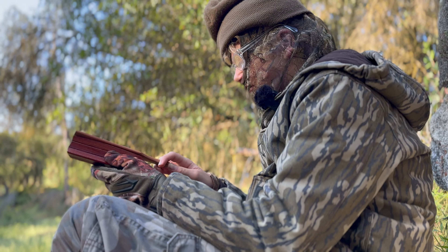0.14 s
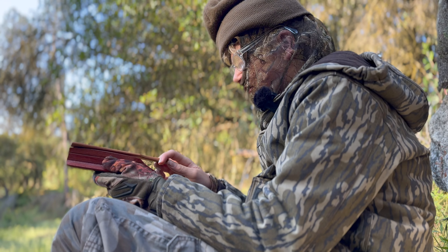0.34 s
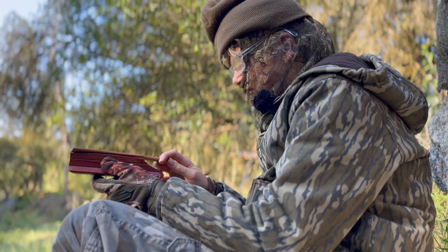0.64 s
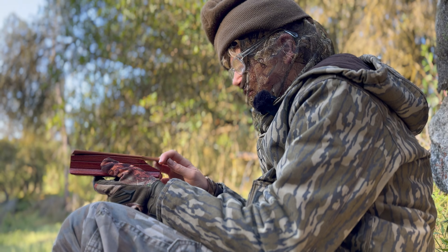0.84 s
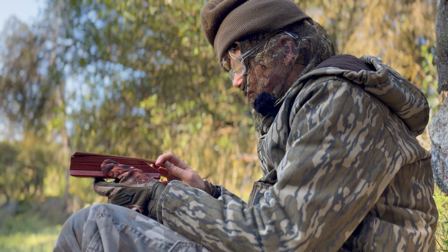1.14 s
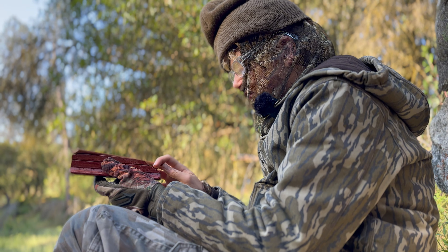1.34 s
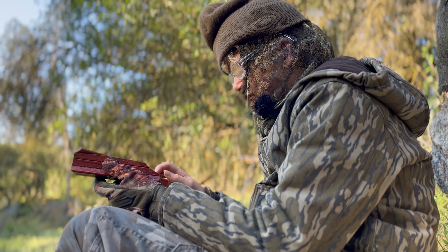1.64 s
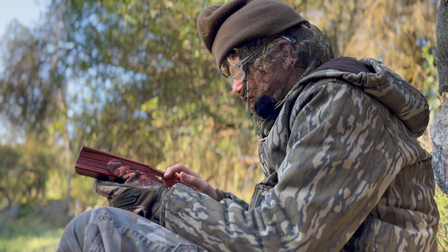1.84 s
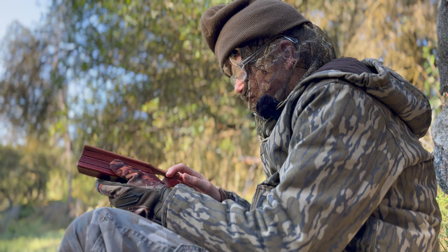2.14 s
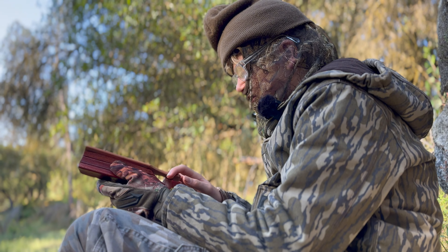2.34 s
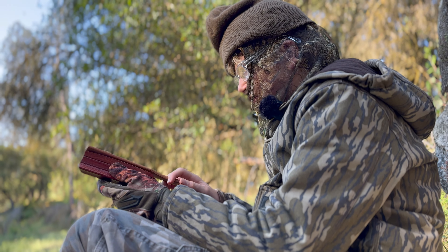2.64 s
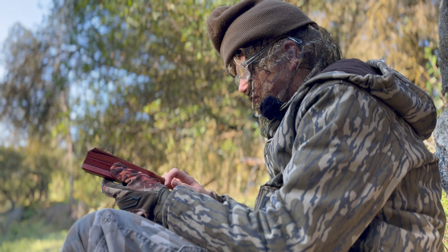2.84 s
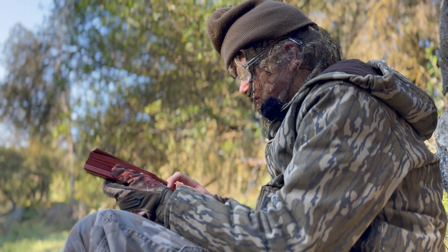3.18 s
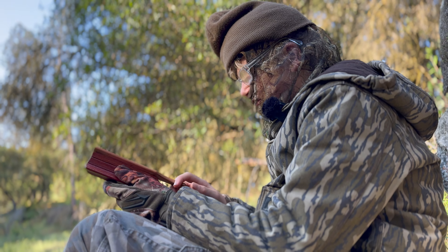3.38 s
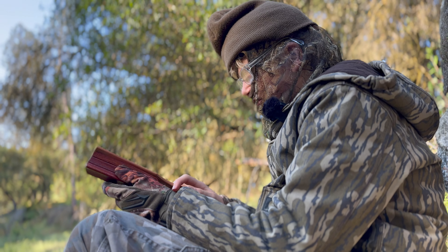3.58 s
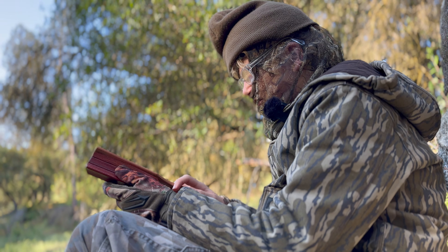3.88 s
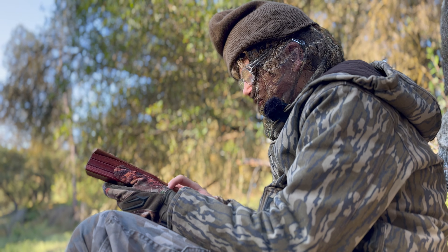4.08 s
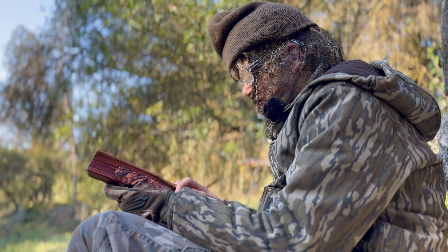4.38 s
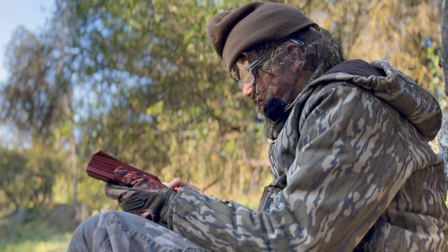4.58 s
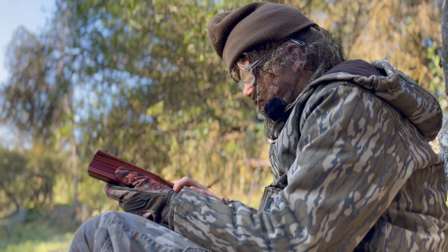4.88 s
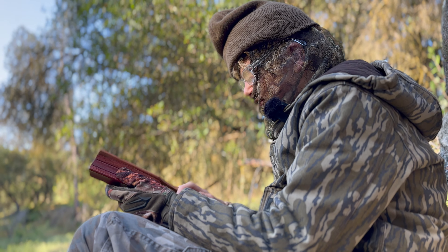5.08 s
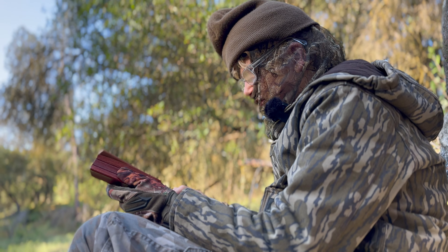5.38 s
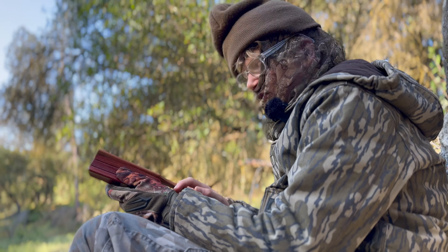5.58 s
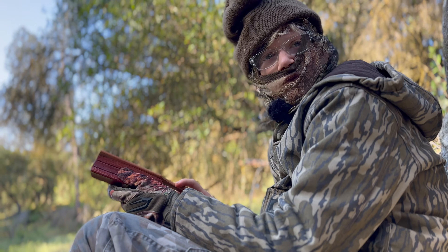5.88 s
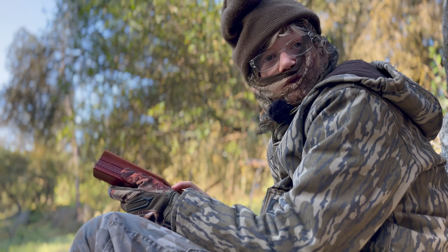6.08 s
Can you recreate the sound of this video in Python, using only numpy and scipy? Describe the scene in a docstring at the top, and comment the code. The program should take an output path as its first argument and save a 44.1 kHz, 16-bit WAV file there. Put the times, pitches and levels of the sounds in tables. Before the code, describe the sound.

Quiet stereo outdoor air with rustling leaves and a far engine rumble. Nearby, a hand-worked box call yelps like a hen: a short clear whistle breaks into a loud, bright woody rasp and stops abruptly. Two yelps are well separated, with brief chirping clucks between; then four come faster, mostly yelp-cluck. The paddle slides back with a faint hiss. A thin songbird chirps and warbles on the right in the middle, and the engine swells slightly late.

```python
"""A short cluck of a hollow wooden box call, amid leaf noise and a far engine; yelps and more clucks follow.
A chalked paddle sticks and slips on the lip: each slip is a click that rings the modes of the box.
A yelp starts as a clear whistle, one slip a cycle, then rasps as the side wall swings at its own pitch.
The paddle's return is hissing noise through the same modes; a songbird of gliding sines sits to the right.
Leaves and engine are shaped stereo noise."""
import sys
import numpy as np
from scipy import signal
from scipy.fft import rfft, irfft, next_fast_len
from scipy.io import wavfile
from scipy.ndimage import uniform_filter1d

SR = 44100
rng = np.random.default_rng(int(sys.argv[2]) if len(sys.argv) > 2 else 0)


def master_out(mix):
    """Clip the mix to full scale and print it as 16-bit PCM to the path in sys.argv[1]."""
    frames = np.transpose(np.atleast_2d(mix))
    ceiling = np.clip(frames, -1, 1)
    pcm = np.round(ceiling * 32767).astype(np.int16)
    wavfile.write(sys.argv[1], SR, pcm)


N = 274325
SIZE = next_fast_len(N + SR // 2)
HZ = np.arange(SIZE // 2 + 1) * SR / SIZE
TIME = np.arange(N) / SR


def from_db(db):
    """Decibels to gain."""
    return 10 ** (np.asarray(db) / 20)


def rms_one(x):
    """Scale to rms 1."""
    return x / np.sqrt(np.mean(x ** 2) + 1e-20)


def at_hz(points):
    """A spectrum table interpolated over log frequency on the FFT grid."""
    hz, value = np.transpose(points)
    return np.interp(np.log(HZ + 1), np.log(hz), value)


def at_time(points):
    """A level table in dB interpolated over time, as gain."""
    s, db = np.transpose(points)
    return from_db(np.interp(TIME, s, db))


def filtered(x, response):
    """Apply a frequency response."""
    return irfft(rfft(x, SIZE) * response, SIZE)[..., :N]


def resonance(hz, width_hz):
    """One mode, gain 1 on top."""
    return 1j * HZ * width_hz / (hz ** 2 - HZ ** 2 + 1j * HZ * width_hz)


def drift(rate_hz):
    """Slow random wander, rms 1."""
    return rms_one(filtered(rng.standard_normal(N), 1 / (1 + 1j * HZ / rate_hz) ** 2))


def evened(x, seconds):
    """Divide out the running level shared by both sides."""
    width = int(seconds * SR)
    power = uniform_filter1d(uniform_filter1d(np.mean(x ** 2, axis=0), width), width)
    return x / np.sqrt(power + 1e-12)


# Yelps. Each row: touch, grip, break, loudest, slowest, last ring, lift (all in seconds), whistle in Hz,
# slip rate when loudest and slowest in Hz, wall swing when loudest, slowest and at the end in Hz,
# low-mode level when loudest and at the last ring in dB, brightness offset in dB,
# low-mode level when slowest in dB, third-tone strength 0-1, climb of the whistle to the break in seconds.
YELP_STROKES = [(1.705, 1.742, 1.795, 1.848, 1.866, 1.913, 1.936, 1090, 905, 875, 1210, 1225, 1495, -12.5, -17, 0, -15, .5, .011),
                (3.165, 3.209, 3.231, 3.266, 3.300, 3.320, 3.342, 1125, 900, 800, 1195, 1010, 1000, -11, -19, -1, -18, .9, .016),
                (4.29, 4.326, 4.350, 4.385, 4.402, 4.443, 4.469, 1180, 924, 870, 1246, 1270, 1490, -11, -14, 0, -13.5, .55, .012),
                (4.671, 4.683, 4.705, 4.755, 4.775, 4.791, 4.814, 1088, 927, 925, 1245, 1250, 1080, -11.5, -13, 0, -13, .45, .02),
                (5.016, 5.027, 5.046, 5.085, 5.112, 5.126, 5.146, 1082, 919, 895, 1300, 1280, 1050, -9.5, -14, 1, -13, .25, .016),
                (5.369, 5.381, 5.400, 5.445, 5.462, 5.476, 5.497, 1083, 900, 890, 1310, 1310, 1050, -9.5, -13, 2, -14, .3, .016)]
# Clucks, the lip nudged briefly. Each row: touch and length in seconds, slowest slip rate in Hz,
# low, middle and bright mode levels in dB, low-mode level at letting go in dB, roughness 0-1.
CLUCK_STROKES = [(0.09, 0.023, 990, -44, -68, -70, -48, .05),
                 (2.478, 0.039, 849, -19.5, -35, -52.5, -43.5, 0.03),
                 (3.43, 0.049, 769.7, -21.5, -29.5, -26.5, -29, .22),
                 (4.838, 0.023, 948.7, -24, -38, -37, -31, .18),
                 (5.186, .028, 948.6, -20.5, -36, -33.5, -25.5, .22),
                 (5.55, .041, 795, -21.5, -31, -28, -25, .24)]
# Edges of the low, middle and bright mode groups in Hz.
MODE_GROUP_EDGES_HZ = [0, 1750, 2800, 20000]


def box_call():
    """Slips and grit ring the box; the hand's pressure sets the level of each stroke."""
    strokes = [yelp(*row) for row in YELP_STROKES] + [cluck(*row) for row in CLUCK_STROKES]
    strokes.sort(key=lambda rows: rows[0, 0])
    s, *columns = np.vstack(strokes).T
    curves = [np.interp(TIME, s, column) for column in columns]
    slip_hz, wall_hz, coupling, low_db, middle_db, bright_db, rough, beat = curves
    gripping = sum((TIME > rows[0][0]) & (TIME < rows[-1][0]) for rows in strokes)
    rough, coupling = np.clip(rough, 0, 1), np.clip(coupling, 0, 1)

    force, phase = slips(slip_hz, wall_hz, coupling, rough, beat)
    grains = rough ** 1.4 * grit(phase, fading=1.2, apart=.33)
    soft = filtered(force, 1 / (1 + 1j * HZ / 7500) ** 4)  # chalk cushions the slip
    low, middle, bright = map(box_response, MODE_GROUP_EDGES_HZ, MODE_GROUP_EDGES_HZ[1:])
    stroke = evened(filtered(force + .22 * grains, low), .006) * from_db(low_db)
    stroke += evened(filtered(force + .42 * grains, middle), .0058) * from_db(middle_db)
    stroke += evened(filtered(soft + .4 * grains, bright), .004) * from_db(bright_db)
    no_bass = (1j * HZ / (450 + 1j * HZ)) ** 3  # the swell of a stroke carries no bass
    return filtered(gripping * stroke, no_bass) + paddle_return(low, middle, bright)


# Stages of a yelp. Each tuple: wall coupling, low, middle and bright mode levels in dB, roughness.
# Bright levels precede the yelp's brightness offset; coupling and roughness are later clipped to 0-1.
TOUCH, GRIP = (0, -57, -59, -62, .5), (0, -26, -28.5, -31, .05)
HOLD, BREAK = (0, -26, -24, -27.5, .18), (0, -22, -13.5, -13.5, .3)
RASP, LIFT = (.9, -17.5, -18.5, -15, .4), (.6, -84, -53, -59.5, -.1)
# Each tuple: wall coupling, middle and bright levels in dB, roughness; the low level is the yelp's own.
LOUDEST, SLOWEST = (1.7, -19.5, -17.5, .46), (.76, -26, -20, .38)
# Last ring: wall coupling, middle and bright levels in dB re the low modes, roughness.
RING_STAGE = (0.25, -14.5, -9, .33)
# Growth of the squeak until the grip: low, middle and bright modes in dB per second.
SQUEAK_GROWTH_DB_PER_S = (596, 1101.5, 1200)
SQUEAK_HZ, BREAK_HZ, RASP_HZ, RING_HZ = 1240, 1165, 985, 1000  # slip rates
WALL_HZ = 1285  # wall swing as it sets in
GRIP_S, BREAK_S, LIFT_S, RING_FADE_DB = .007, .009, .013, -8


def yelp(touch, grip, snap, loudest, slowest, ring, lift, whistle_hz, loud_hz, slow_hz,
         wall_hz, slow_wall_hz, end_wall_hz, loud_db, ring_db, bright_db, slow_db, beat, climb):
    """Squeak, whistle, break, rasp, sag and last ring as the paddle grips, slips and lifts.

    Rows of (s, slip Hz, wall Hz, coupling, low dB, middle dB, bright dB, roughness, third tone)."""
    squeak = max(grip - GRIP_S, touch + .001)
    swollen = np.array(TOUCH[1:4]) + (squeak - touch) * np.array(SQUEAK_GROWTH_DB_PER_S)
    ring_coupling, ring_middle_db, ring_bright_db, ring_rough = RING_STAGE
    last = np.array([ring_db, ring_db + ring_middle_db, ring_db + ring_bright_db])
    hold_end = max(snap - climb, grip + .002)
    fade = max(lift - LIFT_S, ring + .006)
    rows = np.array([
        (touch, SQUEAK_HZ, WALL_HZ, *TOUCH),
        (squeak, SQUEAK_HZ, WALL_HZ, 0, *swollen, .2),
        (grip, whistle_hz, WALL_HZ, *GRIP),
        (hold_end, whistle_hz, WALL_HZ, *HOLD),
        (snap, BREAK_HZ, WALL_HZ, *BREAK),
        (snap + BREAK_S, RASP_HZ, WALL_HZ, *RASP),
        (loudest, loud_hz, wall_hz, LOUDEST[0], loud_db, *LOUDEST[1:]),
        (slowest, slow_hz, slow_wall_hz, SLOWEST[0], slow_db, *SLOWEST[1:]),
        (ring, RING_HZ, end_wall_hz, ring_coupling, *last, ring_rough),
        (fade, RING_HZ, end_wall_hz, LIFT[0], *(last + RING_FADE_DB), ring_rough),
        (lift, RING_HZ, end_wall_hz, *LIFT)])
    rows[:, 6] += bright_db
    return np.column_stack([rows, np.full(len(rows), beat)])


CLUCK_TOUCH_HZ, CLUCK_PEAK_HZ, CLUCK_RECOVERS_HZ_PER_S = 1142.4, 1009, 6500
CLUCK_ATTACK_S, CLUCK_RELEASE_S, CLUCK_QUIET_DB = .009, .012, -61.5
CLUCK_DIP_DB_PER_S, CLUCK_MIDDLE_LOSS_DB = -350, -16
CLUCK_CLEAR = .4  # share of the roughness heard up to the peak


def cluck(touch, length, slow_hz, low_db, middle_db, bright_db, end_db, rough):
    """A falling chirp; held longer, it sags and dips before letting go. The wall stays still."""
    peak = touch + CLUCK_ATTACK_S
    release = touch + max(length - CLUCK_RELEASE_S, CLUCK_ATTACK_S + .002)
    held = release - peak
    dip_db = (low_db + end_db) / 2 + CLUCK_DIP_DB_PER_S * held
    end_hz = min(slow_hz + CLUCK_RECOVERS_HZ_PER_S * held, CLUCK_PEAK_HZ)
    held_db = middle_db + CLUCK_MIDDLE_LOSS_DB
    end_bright_db = bright_db + (end_db - low_db) / 2
    quiet = np.minimum(CLUCK_QUIET_DB, [low_db, middle_db, bright_db])
    clear = CLUCK_CLEAR * rough
    rows = np.array([
        (touch, CLUCK_TOUCH_HZ, WALL_HZ, 0, *quiet, clear),
        (peak, CLUCK_PEAK_HZ, WALL_HZ, 0, low_db, middle_db, bright_db - 3.5, clear),
        (peak + held / 2, slow_hz, WALL_HZ, 0, dip_db, held_db, bright_db, rough),
        (release, end_hz, WALL_HZ, 0, end_db, held_db, end_bright_db, rough),
        (touch + length, end_hz, WALL_HZ, 0, *quiet, rough)])
    return np.column_stack([rows, np.zeros(len(rows))])


def slips(slip_hz, wall_hz, coupling, rough, beat,
          jitter=.14, shimmer_db=9.5, push=.94, shift=.078, swing=.36):
    """Clicks where the paddle lets go; the wall makes slips stronger and earlier or weaker and later."""
    cycles = np.cumsum(slip_hz * (1 + .003 * drift(40) + .036 * rough * drift(60))) / SR
    wall = 2 * np.pi * np.cumsum(wall_hz * (1 + .0198 * rough * drift(59.3))) / SR
    whole = np.arange(1, int(cycles[-1]))
    at = np.interp(whole, cycles, np.arange(N))
    here = at.astype(int)
    chance = np.clip(rng.standard_normal((len(whole), 2)), -2, 2)
    late_cycles = jitter * rough[here] ** 2 * chance[:, 0]
    late_cycles -= shift * coupling[here] * np.sin(wall[here])
    at = np.clip(at + late_cycles * SR / slip_hz[here], 8, N - 9)
    size = from_db(shimmer_db * rough[here] * chance[:, 1])
    size *= np.exp(push * coupling[here] * np.cos(wall[here]))

    clicks, taps = np.zeros(N), np.arange(-7, 9)[:, None]
    spots = at.astype(int) + taps
    away = spots - at  # smooth kernel puts a click between samples
    np.add.at(clicks, spots, size * np.sinc(away) * np.cos(np.pi * away / 16) ** 2)
    third_tone = np.cos(2 * wall - 2 * np.pi * cycles)  # wall and slips beat together
    # the wall also drives the box directly
    swinging = coupling * 2 * slip_hz / SR * (swing * np.cos(wall) + beat * third_tone)
    return clicks + swinging, cycles % 1


def grit(phase, fading, apart):
    """Chalk grains torn loose, most just after a slip, in uneven clumps; partly different on each side."""
    noise = rng.standard_normal((3, N))
    clumps = from_db(2.5 * drift(70))
    return np.exp(-fading * phase) * clumps * (noise[0] + apart * noise[1:])


# Modes of box and paddle, before the bass loss. Each row: frequency in Hz, width in Hz,
# left level in dB, right level in dB, right phase lead in radians.
BOX_MODES = [(1049, 114, -7, -13, -0.1), (1327.4, 71.7, -2.5, -2.5, -0.6), (1513.4, 58, -1.5, -2.5, -0.73),
             (1840, 620, -22.5, -23.5, -2.5), (2234, 105, -17.5, -4.5, -1.87), (2480, 91, -29.5, -9.5, -2),
             (2940, 97, -28, -27, -1.5), (3316, 524, -19.5, -16.5, 3), (3860, 353, -23.5, -12.5, 1.5),
             (4244, 286, -22, -16.5, -1), (4992, 150, -24, -4, 3), (5294, 284, -14, -19, 0.8),
             (5712, 132, -10, -12, 1.63), (6320, 160, -17.5, -18, 2), (6730, 115, -20, -19.5, -0.05),
             (7000, 50, -17.5, -36, 0), (7850, 380, -30, -39.5, 3.5), (8690, 660, -24, -28, 0.54),
             (9100, 120, -35.5, -22, -3.5), (10060, 210, -33.5, -36.5, 3), (11450, 170, -39.5, -38, -6.5),
             (13000, 660, -47, -41.5, -12), (13870, 1500, -50, -46.5, -0.5)]


def box_response(low_hz, high_hz):
    """Left and right response of one group of modes; neighbours alternate in sign."""
    out = np.zeros((2, len(HZ)), complex)
    for k, (hz, width_hz, left_db, right_db, lead) in enumerate(BOX_MODES):
        if low_hz < hz <= high_hz:
            sides = from_db([[left_db], [right_db]]) * np.exp(1j * np.array([[0], [lead]]))
            out += (-1) ** k * sides * resonance(hz, width_hz)
    bass_loss = (resonance(728, 658) * HZ / 500) ** 3  # a small box radiates no bass
    return out * bass_loss


# Paddle sliding back without gripping. Each row: start in seconds, end in seconds,
# mid-slide gain in dB on the hiss.
RETURN_SLIDES = [(1.282, 1.45, -74), (2.62, 2.962, -55.5), (4.031, 4.214, -53), (4.497, 4.61, -56),
                 (4.868, 4.984, -54), (5.22, 5.334, -53.5), (5.496, 5.549, -65)]


def paddle_return(low, middle, bright):
    """Rubbing noise of uneven level through the box modes, swelling and fading with each slide back."""
    sliding = sum(from_db(db) * np.sin(np.pi * np.clip((TIME - start) / (end - start), 0, 1))
                  for start, end, db in RETURN_SLIDES)
    rub = rng.standard_normal(N) * from_db(4.1 * drift(30))
    hiss = rms_one(filtered(rub, low + middle)) + from_db(.5) * rms_one(filtered(rub, bright))
    return sliding * hiss


# Echoes off ground and trunks. Each row: left delay in seconds, right delay in seconds, level in dB.
ECHO_PATHS = [(.006, .008, -14), (.017, 0.029, -40.5), (0.04, 0.026, -36), (.07, .083, -38.5)]


def woods(x, dull_hz=5000):
    """A few dull echoes off ground and trunks, each crossing to the other side."""
    paths = sum(from_db(db) * np.exp(-2j * np.pi * HZ * np.array([[left_s], [right_s]]))
                for left_s, right_s, db in ECHO_PATHS)
    return x + filtered(x[::-1], paths / (1 + 1j * HZ / dull_hz))


WOODS_T60_S, WOODS_DB = .3, 1  # diffuse scatter on the far bird


def bird():
    """Husky gliding sines, stronger on the right, blurred by scatter from the trees."""
    out = np.zeros(N)
    flutter, waver = from_db(3.5 * drift(80)), 1 + .011 * drift(150)
    for rows in song():
        s, hz, db = np.transpose(rows)
        tone = np.sin(2 * np.pi * np.cumsum(np.interp(TIME, s, hz) * waver) / SR)
        out += np.sqrt(2) * tone * from_db(np.interp(TIME, s, db, -200, -200))
    out *= flutter
    tail = rng.standard_normal((2, SR // 3)) * from_db(-60 * TIME[:SR // 3] / WOODS_T60_S)
    scatter = filtered(out, rfft(tail, SIZE) / np.sqrt(np.sum(tail[0] ** 2)))
    return from_db([[-3], [3]]) * out + from_db(WOODS_DB) * scatter


# Arched notes: up, down, sometimes up again. Each row: start, rise, fall and rebound in seconds,
# top in Hz, bottom in Hz, level at the top in dB.
BIRD_ARCHES = [(2.095, 0.035, 0.041, .001, 6200, 5200, -61.5), (2.3, .038, 0.03, .001, 6340, 5100, -60.5),
               (2.875, 0.02, 0.04, 0.021, 6600, 5060, -55.5),
               (2.985, 0.0101, .043, .015, 6250, 5100, -56.5)]
# Sliding notes. Each row: start in seconds, length in seconds, from Hz, to Hz, mid-note level in dB.
BIRD_SLIDES = [(1.32, .025, 3950, 4000, -66), (1.438, .022, 4100, 3950, -61),
               (2.198, .045, 4950, 4000, -64), (2.318, .05, 5450, 4150, -60.5),
               (2.885, .03, 4830, 3780, -57), (2.988, .025, 4570, 3890, -58.5),
               (3.338, .075, 3140, 3256, -58)]
# Shape of the warble. Each row: seconds after its start, Hz before the pitch factor,
# dB re the level of the repeat.
WARBLE_SHAPE = [(0, 4598.5, -2), (.009, 3500, -6), (.014, 2932, -0.5), (0.027, 2991, -13),
                (.034, 3104, 3.5), (.046, 3207, -8.5), (.056, 3550, 0.5), (.075, 3688, -5.5),
                (0.093, 3661, -6), (0.109, 3669, -14)]
# Repeats of the warble. Each row: start in seconds, level in dB, pitch factor.
WARBLE_REPEATS = [(2.413, -52.5, 1.02), (2.528, -50.5, 1), (2.645, -50, 1.0), (2.76, -49.5, 1.004)]
ARCH_START_BELOW_HZ, REBOUND_HZ_PER_S, NOTE_EDGE_DB = 530, 70000, -8


def song():
    """Pitch and level glides of every bird note, as rows of (s, Hz, dB)."""
    notes = []
    for s, rise, fall, back, top, bottom, db in BIRD_ARCHES:
        notes.append([(s, top - ARCH_START_BELOW_HZ, db + NOTE_EDGE_DB),
                      (s + rise / 2, top - ARCH_START_BELOW_HZ / 3, db - 3),
                      (s + rise, top, db),
                      (s + rise + fall, bottom, db - 4.5),
                      (s + rise + fall + back, bottom + REBOUND_HZ_PER_S * back, db)])
    for s, length, from_hz, to_hz, db in BIRD_SLIDES:
        notes.append([(s, from_hz, db + NOTE_EDGE_DB / 2),
                      (s + length / 2, (from_hz + to_hz) / 2, db),
                      (s + length, to_hz, db + NOTE_EDGE_DB)])
    for s, db, pitch in WARBLE_REPEATS:
        notes.append([(s + t, hz * pitch, db + offset_db) for t, hz, offset_db in WARBLE_SHAPE])
    return notes


# Leaves and far air. Each row: frequency in Hz, relative density in dB per Hz.
AIR_SPECTRUM = [(88, -30), (150, -13.5), (352, -5), (572, -5.5), (985, -2.5), (1340, -5.5), (1480, -3),
                (1660, -9), (3040, -9.5), (5030, -12.5), (5760, -16), (10100, -25), (15500, -47.5)]
# Breeze in the leaves. Each row: time in seconds, level in dB.
BREEZE = [(0, -53), (2.3, -54.5), (3.2, -51), (3.7, -54), (4.8, -52.5), (5.6, -55.5), (6.22, -54.5)]


def leaves():
    """Shaped stereo noise whose level follows the breeze."""
    return at_time(BREEZE) * outdoor_noise(from_db(at_hz(AIR_SPECTRUM)), patchy_db=1.57)


# Far engine's rumble. Each row: frequency in Hz, relative density in dB per Hz.
RUMBLE_SPECTRUM = [(13, -45), (22, -10.5), (48, -2.5), (70, -0.5), (107, -3), (134, -9), (200, -19),
                   (260, -46), (440, -120)]
# Engine loudness. Each row: time in seconds, level in dB.
ENGINE_LEVEL = [(0.0, -60), (0.08, -60), (4.87, -56), (5.16, -49), (5.42, -54), (6.17, -49.5), (6.22, -55)]
# Firing orders. Each row: frequency in Hz, width in Hz, level in dB re the rumble.
FIRING_ORDERS = [(64.7, 6, -4), (101.5, 5.4, -8.5)]


def engine():
    """Low rumble with two firing orders as narrow wavering noise bands, drawing nearer by level alone."""
    sound = outdoor_noise(from_db(at_hz(RUMBLE_SPECTRUM)), patchy_db=2.5)
    for hz, width_hz, order_db in FIRING_ORDERS:
        order = rms_one(filtered(rng.standard_normal(N), resonance(hz, width_hz)))
        sound = sound + from_db(order_db) * order
    return rms_one(sound) * at_time(ENGINE_LEVEL)


# Likeness of the two sides. Each row: frequency in Hz, share common to both 0-1.
SIDE_LIKENESS = [(60, 0.89), (200, 1), (500, 0.71), (1500, 0.076), (5000, 0.13), (9000, 0.35), (12000, 1)]
AIR_LAG_S = .000435  # common part reaches the right side later, below 9 kHz


def outdoor_noise(response, patchy_db):
    """Stereo noise, partly common to both sides and later on the right; rms 1 before its slow patches."""
    common, left, right = rng.standard_normal((3, N))
    alike = np.sqrt(np.clip(at_hz(SIDE_LIKENESS), 0, 1))
    lag = np.exp(-2j * np.pi * HZ * AIR_LAG_S * (HZ < 9000))
    own = filtered(np.array([left, right]), response * np.sqrt(1 - alike ** 2))
    shared = filtered(common, response * alike * np.array([np.ones_like(lag), lag]))
    return rms_one(own + shared) * from_db(patchy_db * drift(4.8))


def scene():
    """Call with echoes, bird, leaves and engine."""
    return woods(box_call()) + bird() + leaves() + engine()


CUTOFF_HZ = 15700


def record(dry):
    """The microphone drops the deepest bass and rounds the highest peaks; the top is cut."""
    thin = signal.sosfilt(signal.butter(2, 36, "high", fs=SR, output="sos"), dry)
    rounded = thin / (1 + (np.abs(thin) / .95) ** 8) ** .125
    return signal.sosfilt(signal.ellip(12, .5, 90, CUTOFF_HZ, fs=SR, output="sos"), rounded)


dry = scene()
out = record(dry)
master_out(out)
```